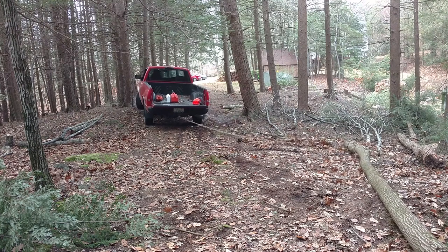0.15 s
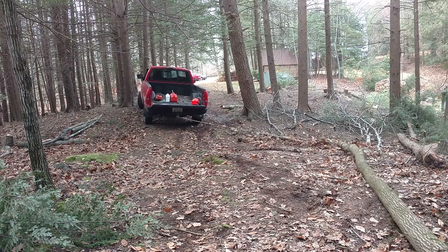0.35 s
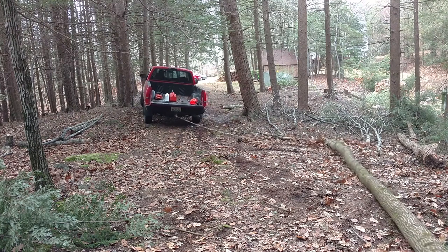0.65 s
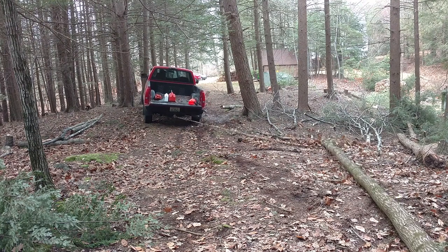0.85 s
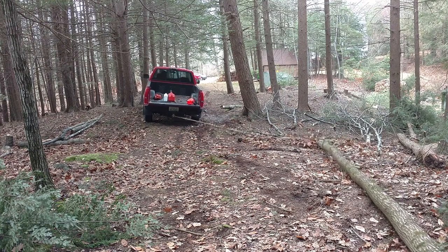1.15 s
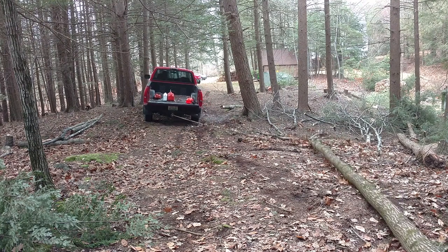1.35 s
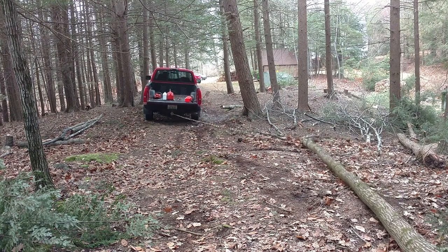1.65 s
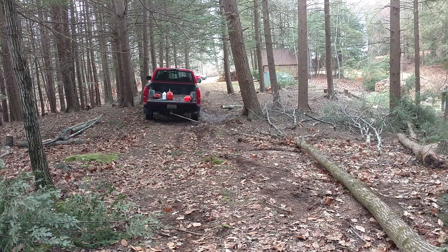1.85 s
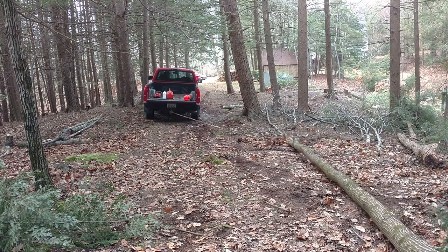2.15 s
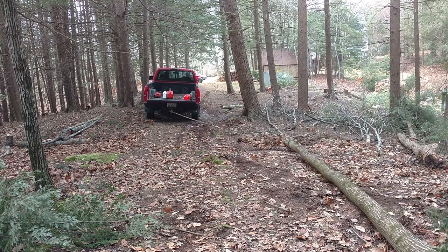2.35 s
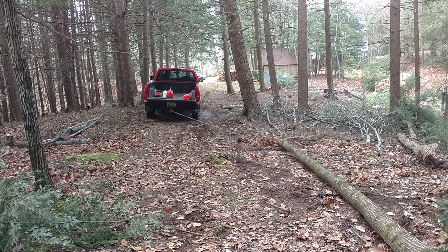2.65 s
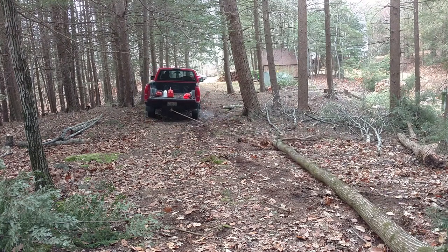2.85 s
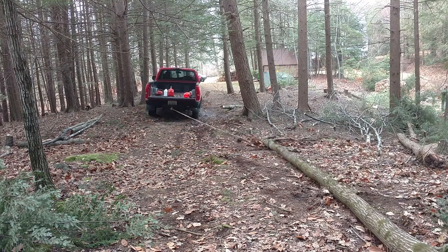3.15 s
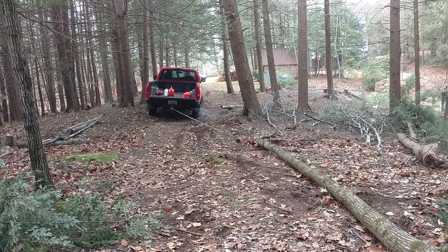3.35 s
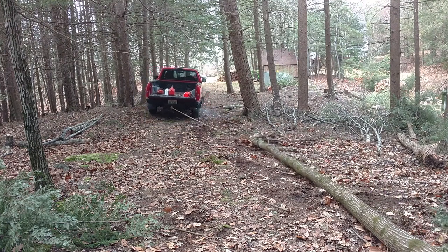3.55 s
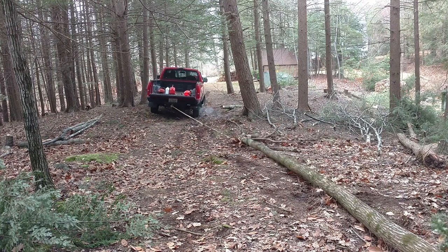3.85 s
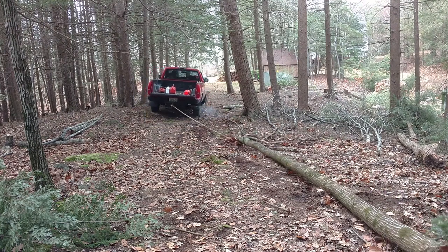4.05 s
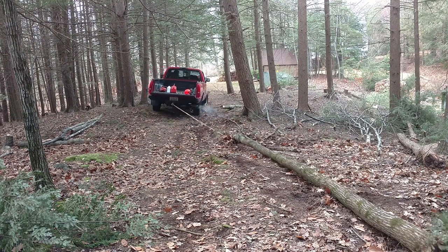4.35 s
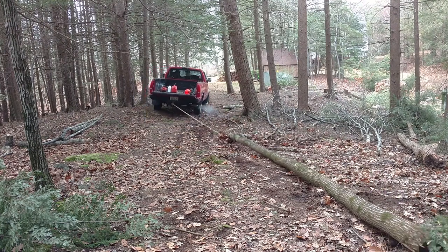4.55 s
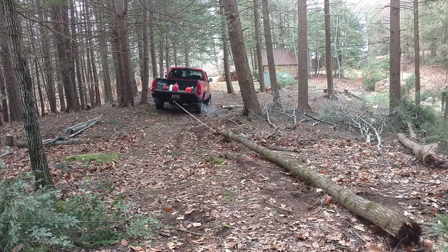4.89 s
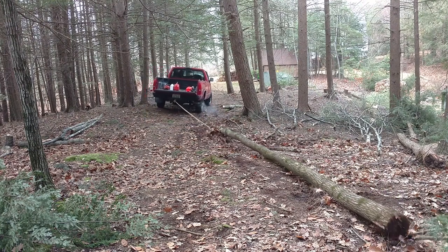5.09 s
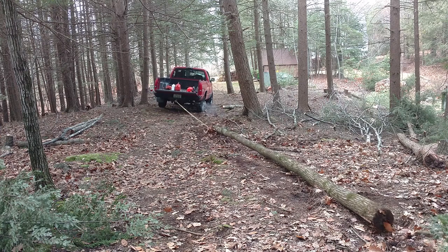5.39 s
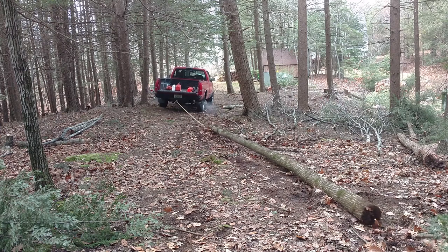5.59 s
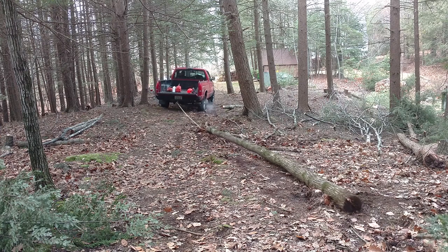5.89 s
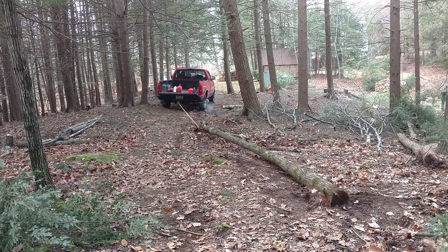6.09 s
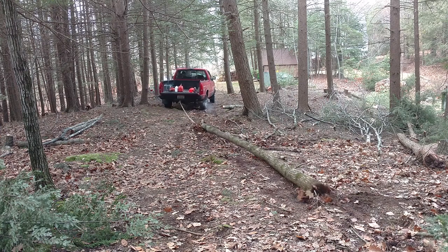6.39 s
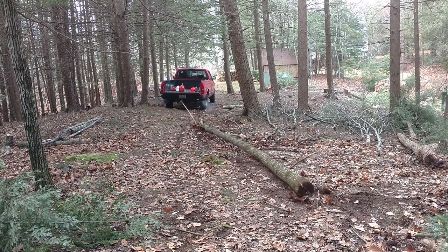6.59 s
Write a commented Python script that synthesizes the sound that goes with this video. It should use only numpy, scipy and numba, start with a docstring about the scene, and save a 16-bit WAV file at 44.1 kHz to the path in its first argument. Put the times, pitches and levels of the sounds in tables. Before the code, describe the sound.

A truck tows a chained log through woods, heard by a small outdoor camera with thin bass and wide stereo. Leaves fizz and rustle throughout, broken by brittle cracks and hollow root knocks. The low, uneven engine grumbles, then climbs in several revs. The leaf noise is strongest past the middle, then fades towards the end while the engine rises once more, then eases, among scattered small twig ticks.

```python
"""Leaves hiss and crackle under a dragged log, twigs snap and the log knocks on roots; an engine lugs and surges.
A pickup truck drags the chained log over dry leaves in a wood, past a small camera.
Engine: shaft orders and gas noise through pipe modes. Leaves and soil: noise beds with clicks.
Snaps: ringing noise bursts. Knocks: decaying sines with a soil thud.
The camera steps its gain down after loud peaks and widens its stereo picture."""
import sys
import numpy as np
from scipy import signal
from scipy.fft import rfft, irfft, next_fast_len
from scipy.io import wavfile
from scipy.ndimage import uniform_filter1d
from numba import njit

SR = 44100
rng = np.random.default_rng(int(sys.argv[2]) if len(sys.argv) > 2 else 0)


def transcribe(signal):
    """Save signal, clipped to [-1, 1], as a 16-bit WAV file at the path in sys.argv[1]."""
    frames = np.atleast_2d(signal).T
    limited = np.clip(frames, -1, 1)
    pcm = np.round(limited * 32767).astype(np.int16)
    wavfile.write(sys.argv[1], SR, pcm)


N = 296793  # samples


def gain_of(db):
    """Amplitude factor of a level in dB."""
    return 10 ** (np.asarray(db) / 20)


def evened(x):
    """Scale to rms 1."""
    return x / np.sqrt(np.mean(x ** 2) + 1e-20)


def read(points, hz):
    """Interpolate (frequency, value) rows over log frequency."""
    point_hz, value = np.transpose(points)
    return np.interp(np.log(hz + 1), np.log(point_hz + 1), value)


def curve(rows, column):
    """One column of a table of times, interpolated to every sample."""
    rows = np.array(rows)
    return np.interp(np.arange(N) / SR, rows[:, 0], rows[:, column])


def add(mix, start_s, sound):
    """Mix a sound in at its start time, cut at the end of the mix."""
    part = mix[round(start_s * SR):][:len(sound)]
    part += sound[:len(part)]


def resonate(x, hz, width_hz):
    """One-pole resonance: shift hz down to 0, low-pass, shift back up."""
    turn = np.exp(2j * np.pi * hz * np.arange(len(x)) / SR)
    r = np.exp(-np.pi * width_hz / SR)
    return 2 * (turn * signal.lfilter([1 - r], [1, -r], x / turn)).real


def resonate_twice(x, hz, width_hz):
    """Two equal resonances in series, for steeper skirts."""
    return resonate(resonate(x, hz, width_hz), hz, width_hz)


def wander(hz):
    """Slow random signal of rms 1, with changes up to about hz."""
    return evened(signal.lfilter(*signal.butter(2, hz, fs=SR), rng.standard_normal(N)))


def engine():
    """Uneven cylinders repeat one pattern a turn: shaft orders swell at pipe modes, rough gas makes these hum."""
    # crankshaft speed: (time [s], speed [turns/s])
    shaft = [(0, 16.3), (.3, 16.4), (.7, 16.9), (.94, 16.5), (1.33, 16.4), (1.85, 16.3), (2.15, 15.9),
             (2.51, 17.6), (2.85, 19.8), (3.13, 17.2), (3.35, 17.8), (3.71, 22.7), (4.03, 19.6),
             (4.31, 24.1), (4.46, 25.6), (4.7, 23.9), (5.09, 18.7), (5.3, 22.4), (5.6, 25.2), (5.88, 26.6),
             (6.02, 26), (6.22, 22.7), (6.56, 21.5), (6.73, 21.5)]
    # engine effort: (time [s], level [dB])
    effort = [(0, -48), (.32, -38.5), (.48, -42), (.64, -37.5), (.8, -42), (1.1, -35.5), (1.28, -43.5),
              (1.6, -44.5), (1.76, -41), (2.08, -45), (2.56, -38), (2.85, -34), (3.3, -35.5), (3.55, -33.5),
              (3.84, -35.5), (4.12, -40.5), (4.45, -30), (4.7, -39.5), (4.95, -35), (5.25, -36),
              (5.44, -33.5), (5.7, -29.5), (6.0, -32), (6.2, -34.5), (6.45, -36.5), (6.73, -42)]
    # exhaust pipe modes: (frequency [Hz], width [Hz], level [dB])
    pipe = [(83, 14, -4), (67, 36, -10), (125, 70, -14), (162, 16, 0), (205, 60, -16), (252, 36, -6),
            (325, 40, -15), (410, 40, -20)]
    # orders that stand out, {multiple of shaft speed: (lugging level [dB], revving level [dB])}
    firing = {3: (2, 8), 4: (-5, 5), 5: (11, 4), 6: (0, 2), 7: (0, 3), 10: (6, 0), 12: (0, 4), 15: (6, 0)}
    # lugging gives way to revving: (from [turns/s], to [turns/s])
    revving = (19.5, 21.5)
    # base unsteadiness of each order, every order wavering on its own: (lugging [dB], revving [dB])
    waver_db = (0, 2)
    flywheel_s = .06  # speed changes are rounded over this time

    smooth_speed = uniform_filter1d(curve(shaft, 1), round(flywheel_s * SR))
    speed = smooth_speed * (1 + .004 * wander(9))
    turns = np.cumsum(speed) / SR

    orders = np.zeros(N)
    for k in range(2, 20):
        power = sum(gain_of(2 * db) / (1 + (2 * (k * speed - hz) / width) ** 2) ** 2
                    for hz, width, db in pipe)
        order_db = np.interp(speed, revving, firing.get(k, (0, 0)))
        unsteady_db = np.interp(speed, revving, waver_db) + k / 7  # high orders waver more
        size = np.sqrt(power) * gain_of(order_db + unsteady_db * wander(7))
        orders += size * np.cos(2 * np.pi * (k * turns + rng.random()))

    puff_size = 0.5 + np.exp(-(turns % 1) / 0.63)
    puffs = puff_size * rng.standard_normal((len(pipe), N))
    hum = sum(gain_of(db) * resonate_twice(gas, hz, 1.6 * width)
              for gas, (hz, width, db) in zip(puffs, pipe))

    near = gain_of(curve(effort, 1)) * evened(evened(orders) + .3 * evened(hum))
    # trunks scatter the sound: each port gets its own late copy
    left = near + .07 * np.roll(near, 900)
    right = .97 * near + .07 * np.roll(near, 1400)
    return np.array([left, right])


def bumps():
    """Log on roots: a soft blow rings the wet wood, with a weaker, shorter overtone and a thud of soil."""
    # knocks: (time [s], level [dB], pitch [Hz], t60 [s])
    knocks = [(.405, -18.5, 600, 0.018), (0.682, -25, 980, 0.028), (0.998, -11, 205, 0.059),
              (1.025, -13, 219, 0.11), (1.892, -15, 193, 0.091), (1.9112, -18, 485, 0.024),
              (4.634, -30, 260, 0.18), (4.78, -25.5, 261.5, 0.11), (4.935, -28, 268, 0.091),
              (5.116, -25.5, 159, 0.091), (5.92, -25.5, 294, 0.16), (6.455, -26.5, 258, 0.1),
              (6.1264, -19, 644, 0.011)]
    out, t = np.zeros(N), np.arange(SR // 3) / SR
    for (start_s, db, hz, t60_s), soil in zip(knocks, rng.standard_normal((len(knocks), len(t)))):
        fall = gain_of(-60 * t / t60_s)
        attack = 1 - np.exp(-t * hz / 2.1)
        wood = np.sin(2 * np.pi * hz * t) + .4 * fall * np.sin(2 * np.pi * 1.6 * hz * t)
        thud = .45 * evened(resonate_twice(soil, 1.4 * hz, 1.3 * hz))
        add(out, start_s, gain_of(db) * fall * attack * (wood + thud))
    return out


def snaps():
    """Twigs and bark: a sharp crack with a splintering tail, later at the left while the log lies to the right."""
    # snaps: (time [s], peak [dB], centre [Hz], wide crack over the ring [dB], t60 [s])
    twigs = [(0.412, -16, 6500, -13, 0.0023), (0.6797, -10, 1250, -0.5, 0.0027),
             (0.688, -15.5, 1700, -7, 0.0027), (0.725, -14, 4500, -10, 0.0041),
             (.7854, -5.5, 8800, -5, .0026), (1.605, -16, 5000, 1, 0.0036), (1.7692, -14, 4160, -2, 0.0037),
             (1.851, -21, 3440, -10, 0.0027), (1.9111, -2.3, 4000, 3, .0023), (1.914, -14, 1510, -8, 0.014),
             (2.177, -19, 3770, -1, 0.0023), (2.335, -30, 1490, -12, 0.0044),
             (2.573, -17, 4030, -28, 0.019), (3.1205, -10, 4270, -27, 0.024),
             (3.169, -18, 2520, -15, 0.003), (3.931, -17, 2995, -6, .003), (3.939, -11, 4000, -14, 0.0026),
             (4.009, -13, 4340, -26, 0.004), (4.067, -15, 7000, -20, 0.008),
             (4.153, -22, 4000, -10, 0.0035), (5.1712, -21, 4030, 10, 0.0036),
             (5.192, -25, 3600, 3, 0.0046), (5.37, -14.5, 1560, 12, 0.0033), (5.617, -20, 1290, 0, 0.0028),
             (5.624, -20.5, 4440, -2, .003), (5.6377, -23, 3770, -18, 0.0065),
             (5.648, -24, 4000, -11, .003), (5.666, -30, 4000, 0, .003), (5.69, -26, 4000, -6, 0.0056),
             (5.6972, -21, 6870, 5, 0.0022), (5.7202, -16, 1520, 0.5, 0.0037),
             (6.048, -17, 3550, -6, 0.0064), (6.096, -31, 5000, 4, .004), (6.1264, -9.5, 2000, -2, .003),
             (6.136, -33, 5960, -9, 0.0039), (6.698, -21, 3430, -16, 0.01)]
    # lag of the left port: (time [s], delay [s])
    left_lag = [(0, .0001), (2, .00008), (4, .00008), (5, 0)]
    out, t = np.zeros((2, N)), np.arange(900) / SR
    noise = rng.standard_normal((len(twigs), 2, 900))
    wide = signal.butter(2, [950, 9000], "band", fs=SR, output="sos")
    air = signal.butter(4, 13000, fs=SR, output="sos")  # the very top is lost on the way
    for (start_s, db, hz, wide_db, t60_s), (common, own) in zip(twigs, noise):
        late_s = (np.interp(start_s, *np.transpose(left_lag)), 0)
        attack = 1 - np.exp(-t / (0.34 * t60_s))
        tail = 0.023 * gain_of(-60 * t / 0.036)
        shape = attack * (gain_of(-60 * t / t60_s) + tail)
        for port in range(2):
            burst = (common + 0.48 * own * (-1) ** port) * shape
            ring = resonate_twice(burst, hz, 0.73 * hz)
            crack = evened(ring) + gain_of(wide_db) * evened(signal.sosfilt(wide, burst))
            crack = signal.sosfilt(air, crack)
            add(out[port], start_s + late_s[port], gain_of(db) * crack / abs(crack).max())
    return out


def from_around(sources, colour):
    """Two unrelated sources are coloured and shared between the ports, less alike at high frequency."""
    # two microphone ports, sound from all around: (frequency [Hz], likeness [0-1])
    ports = [(100, 1), (500, 0.82), (1000, 0.78), (2000, 0.12), (16000, 0.016)]
    size = next_fast_len(N)
    hz = np.fft.rfftfreq(size, 1 / SR)
    one, two = rfft(sources, size) * gain_of(read(colour, hz))
    same = np.clip(read(ports, hz), 0, 1)
    mid = np.sqrt(1 + same) * (one + two)
    side = np.sqrt(1 - same) * (one - two)
    return evened(irfft(np.array([mid + side, mid - side]), size)[:, :N])


def crackle(per_s, spread_db, share, flutter_db):
    """Many leaves crush at once (noise), some singly (clicks of very unequal size); the level flutters."""
    click_db = spread_db * np.minimum(rng.exponential(1, (2, N)), 3)
    clicks = gain_of(click_db) * (rng.random((2, N)) < per_s / SR)
    bursts = signal.lfilter([1], [1, -.95], clicks) * rng.standard_normal((2, N))
    share = np.clip(share, 0, 1)  # power share of the clicks
    bed = np.sqrt(1 - share) * rng.standard_normal((2, N)) + np.sqrt(share) * evened(bursts)
    return bed * gain_of(flutter_db * wander(11.4))


def flurry_db(column):
    """Heaps of leaves swept up at once: each flurry swells fast and fades away."""
    # flurries: (time [s], swell before rise and fade [dB], extra swell of the scrape, likewise [dB])
    flurries = [(1.0, -0.5, 11.5), (1.915, 11.5, -11), (3.12, 10.5, 0), (5.62, 3.5, 2.5)]
    rise_s, fade_s = 0.025, 0.066
    total_db = np.zeros(N)
    for row in flurries:
        since_s = np.maximum(np.arange(N) / SR - row[0], 0)
        total_db += row[column] * np.minimum(since_s / rise_s, 1) * np.exp(-since_s / fade_s)
    return total_db


def log_on_leaves():
    """Rustle and fizz share one crackle; the scrape on the soil is smoother and lower."""
    # sliding log: (time [s], leaf rustle level [dB])
    drag = [(0, -37), (.13, -36), (.26, -40), (.39, -35), (.83, -32), (.97, -41.5), (1.04, -37),
            (1.82, -38), (2.08, -40.5), (2.47, -41.5), (2.73, -37), (3.2, -35), (3.51, -29), (3.77, -26.5),
            (4.03, -29.5), (4.29, -36.5), (4.81, -36), (5.16, -39), (5.33, -37.5), (5.6, -40),
            (5.85, -39.5), (6.15, -42), (6.5, -45), (6.73, -44)]
    # balance: (time [s], dry fizz over the rustle [dB], soil scrape over the rustle [dB])
    balance = [(0, -2.5, -4.5), (.65, -5, -4), (1.3, -4, -2), (2.4, -6.5, -3), (3.6, -6.5, -6),
               (4.05, -5, -6), (4.6, -6.5, -2), (5.5, -8, -1.5), (6.2, -3, 0.5), (6.6, -8, 3)]
    # stereo spread: (time [s], level of the side signal [dB])
    spread = [(0, 1.5), (1.5, 1), (3.0, 0), (4.2, 0.5), (5.0, -4), (5.8, -2), (6.73, -0.5)]
    # leaf rustle spectrum: (frequency [Hz], relative density [dB per Hz])
    rustle_colour = [(700, -28), (1500, -7), (2600, 1.5), (4500, 0.5), (6000, -1), (7500, -20),
                     (10000, -17.5), (12000, -29)]
    # dry fizz spectrum: (frequency [Hz], relative density [dB per Hz])
    fizz_colour = [(5000, -25), (7000, -2), (8500, 0), (10500, -8), (13000, -17), (15000, -23),
                   (15500, -55)]
    # soil scrape spectrum: (frequency [Hz], relative density [dB per Hz])
    scrape_colour = [(45, -46), (100, 8.5), (250, 3.5), (400, -1.5), (800, -4.5), (1500, -6), (2300, -10.5),
                     (4000, -55), (6000, -63)]

    leaves = crackle(per_s=330, spread_db=5.0, share=0.14, flutter_db=1.18)
    soil = crackle(per_s=200, spread_db=2.5, share=0.16, flutter_db=0.5)
    rustle = from_around(leaves, rustle_colour)
    fizz = gain_of(curve(balance, 1)) * from_around(leaves, fizz_colour)
    scrape = gain_of(curve(balance, 2) + flurry_db(2)) * from_around(soil, scrape_colour)
    slide = rustle + fizz + scrape
    mid = slide.mean(0)
    slide = mid + gain_of(curve(spread, 1)) * (slide - mid)
    return gain_of(curve(drag, 1) + flurry_db(1)) * slide


def dips_db():
    """The steady sounds drop suddenly and climb back at a steady rate in dB."""
    # dips: (time [s], depth before the return [dB])
    dips = [(4.007, 6.5), (5.181, 4.5), (6.13, 3)]
    fall_s, return_db_per_s = 0.019, 8
    t = np.arange(N) / SR
    return -sum(np.clip((t - start_s) / fall_s, 0, 1) * np.maximum(db - return_db_per_s * (t - start_s), 0)
                for start_s, db in dips)


def scene():
    """Engine and sliding log dip together; snaps and bumps do not."""
    steady = engine() + log_on_leaves()
    return gain_of(dips_db()) * steady + snaps() + bumps()


def hollowed(x):
    """One band is taken out of what both sides share, by a varying amount."""
    # hollow centre of the stereo picture: (time [s], depth [dB])
    hollow = [(0, 40), (.42, 35), (.5, 28), (.74, 30), (.77, 0), (.8, 35), (1.66, 40), (1.74, 10), (1.9, 4),
              (1.95, 32), (3.08, 32), (3.115, 4), (3.14, 35), (4.45, 40), (4.8, 12), (5.0, 2), (5.85, 2),
              (5.95, 14), (6.02, 0), (6.14, 0), (6.18, 16), (6.47, 12), (6.55, 0), (6.73, 0)]
    centre_hz, width_hz = 2527, 587
    size = next_fast_len(N)
    hz = np.fft.rfftfreq(size, 1 / SR)
    window = np.exp(-(2 * (hz - centre_hz) / width_hz) ** 12)
    band = irfft(rfft(x.mean(0), size) * window, size)[:N]
    return x - (1 - gain_of(-np.maximum(curve(hollow, 1), 0))) * band


@njit
def stepped_gain_db(peak_db, ceiling_db, step_db, creep_db, wait):
    """A peak over the ceiling lowers the gain one step, at most once per wait; it creeps back per sample."""
    down_db, last, out = 0., -wait, np.zeros(len(peak_db))
    for i in range(len(peak_db)):
        if peak_db[i] - down_db > ceiling_db and i - last > wait:
            down_db, last = down_db + step_db, i
        down_db = max(down_db - creep_db, 0.)
        out[i] = -down_db
    return out


def record(dry):
    """Bass cut, gain control, each side less a late copy of the other (wider stereo), hollow, band limit."""
    # share of each side taken out of the other: (frequency [Hz], share [0-1])
    cross = [(60, 0.47), (300, 0.43), (1300, 0.76), (2600, 0.54), (5000, 0.64), (10000, 0.34),
             (13000, 0.71)]
    ceiling_db, step_db, creep_db_per_s = -7, 12, 7
    cross_delay_samples, most_cross, edge_hz = 17, .97, 16400

    bass_cut = signal.butter(5, 63, "high", fs=SR, output="sos")
    x = signal.sosfilt(bass_cut, dry * gain_of([[.3], [-.3]]))

    peak_db = 20 * np.log10(abs(x).max(0) + 1e-9)
    gain_db = stepped_gain_db(peak_db, ceiling_db, step_db, creep_db_per_s / SR, SR // 50)
    late_db = np.pad(gain_db, (130, 0))[:N]  # the step comes about 3 ms after the peak
    x = x * gain_of(uniform_filter1d(late_db, size=120))

    size = next_fast_len(N + 100)
    hz = np.fft.rfftfreq(size, 1 / SR)
    share = np.clip(read(cross, hz), 0, most_cross)
    late = share * np.exp(-2j * np.pi * hz * cross_delay_samples / SR)
    other_side = irfft(rfft(x[::-1], size) * late, size)[:, :N]
    x = hollowed(x - other_side)

    band_limit = signal.firwin(511, edge_hz, window=("kaiser", 9), fs=SR)
    return signal.oaconvolve(x, band_limit[None], "same")


dry = scene()
out = record(dry)
transcribe(out)
```